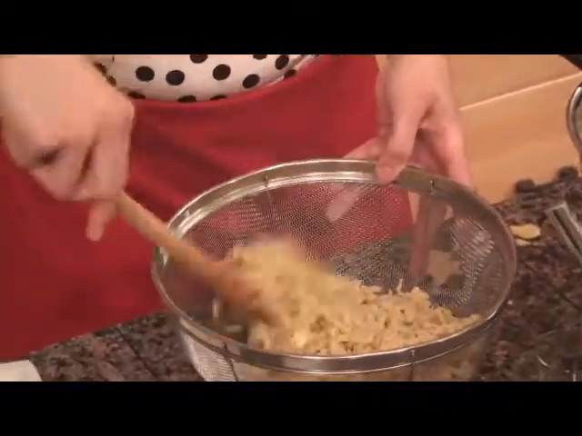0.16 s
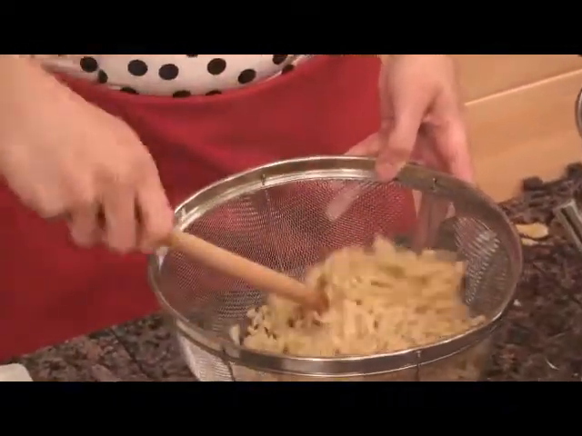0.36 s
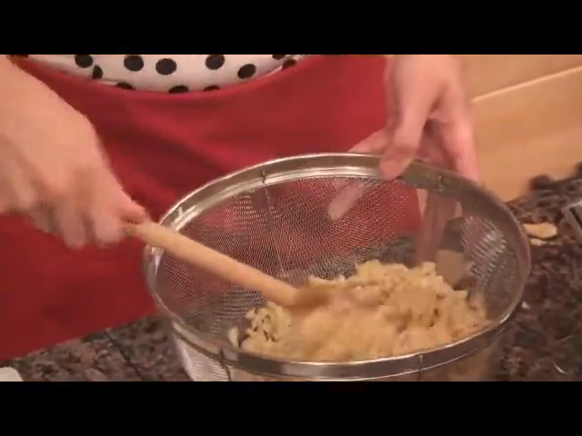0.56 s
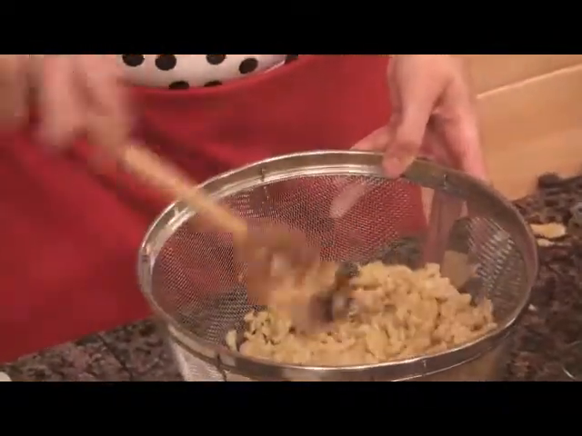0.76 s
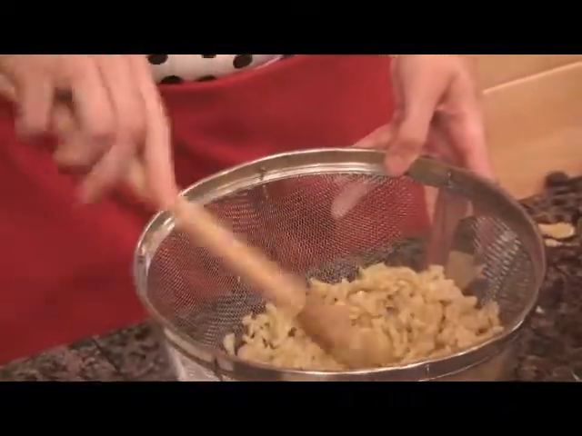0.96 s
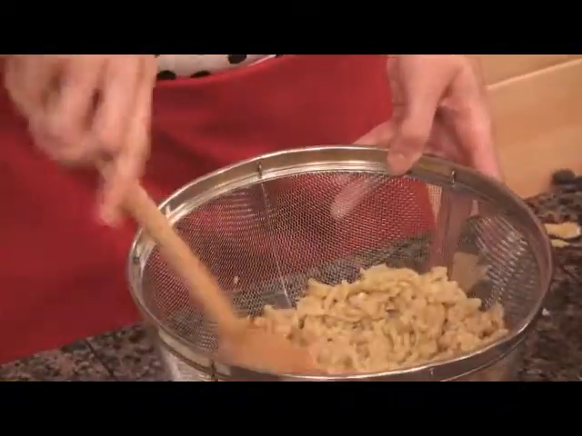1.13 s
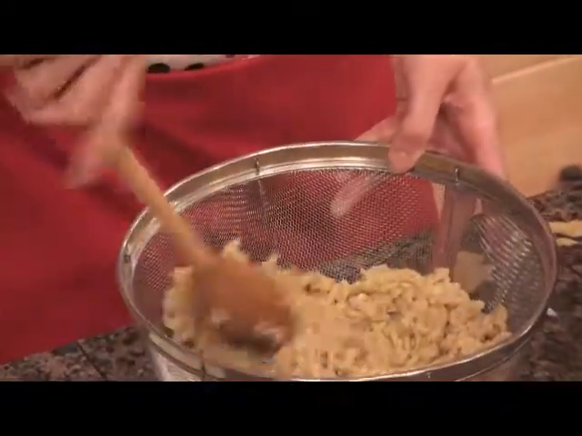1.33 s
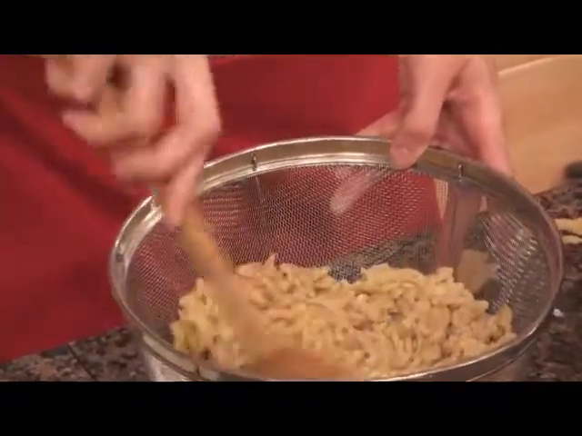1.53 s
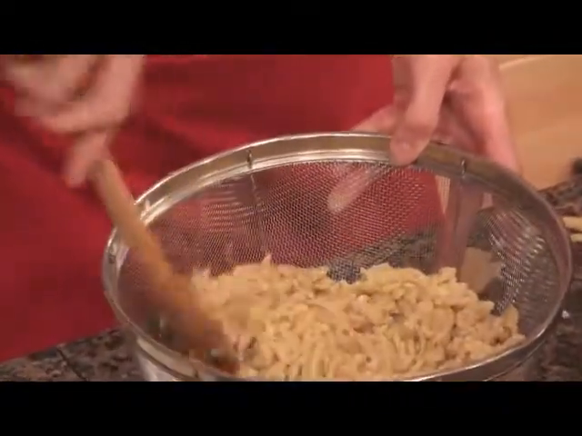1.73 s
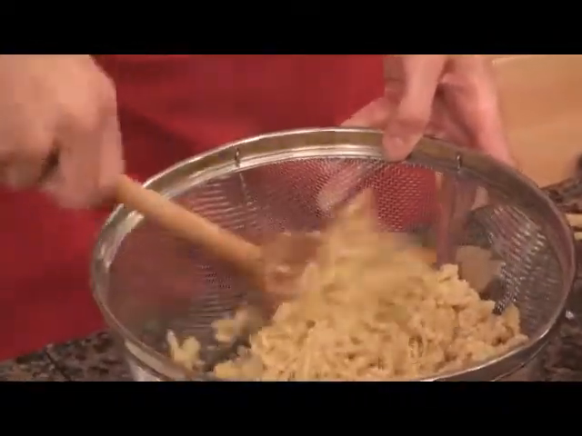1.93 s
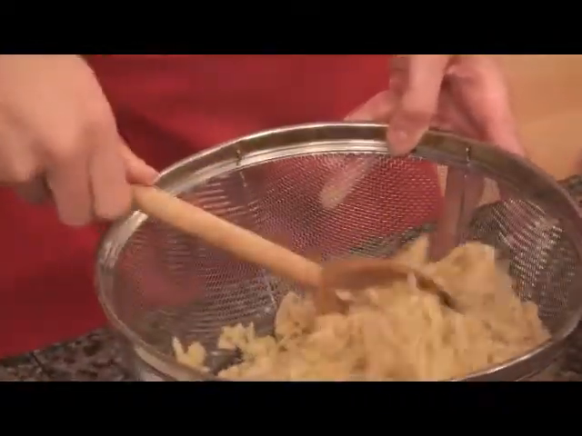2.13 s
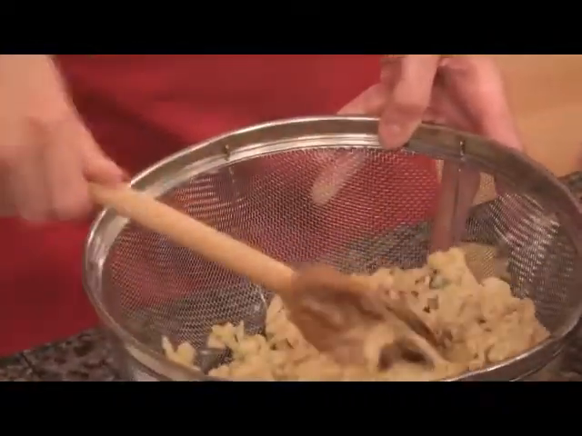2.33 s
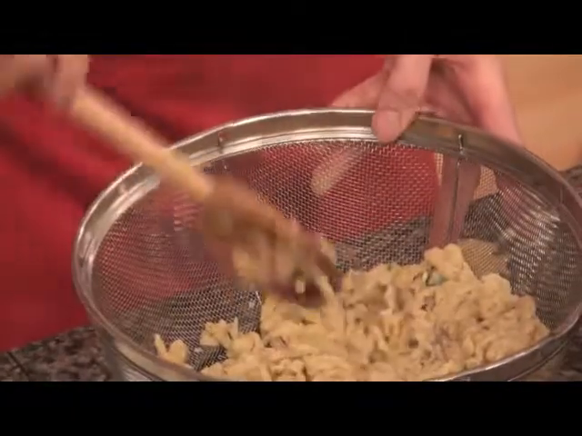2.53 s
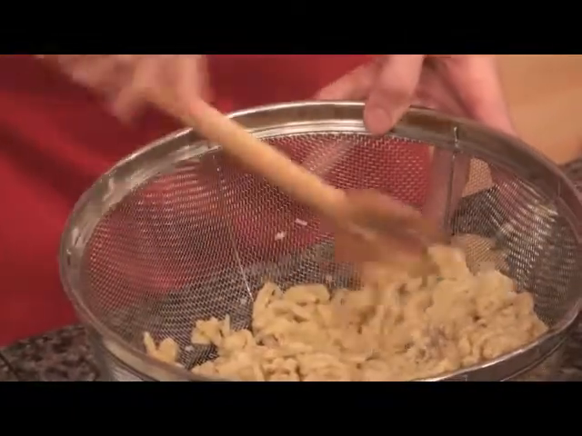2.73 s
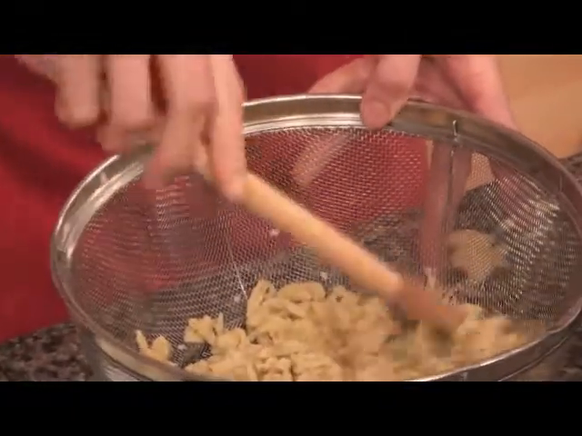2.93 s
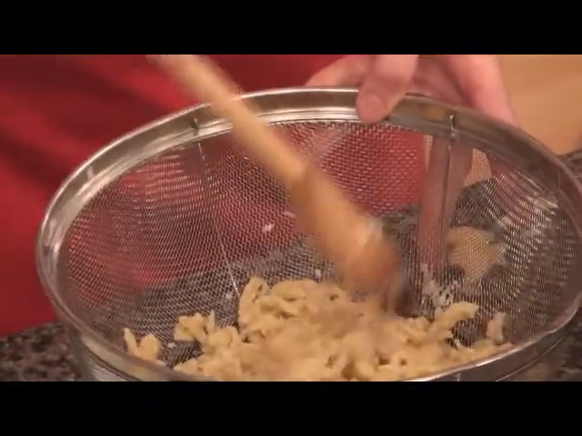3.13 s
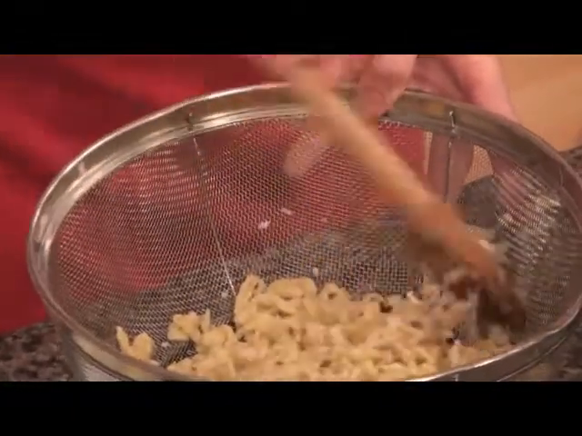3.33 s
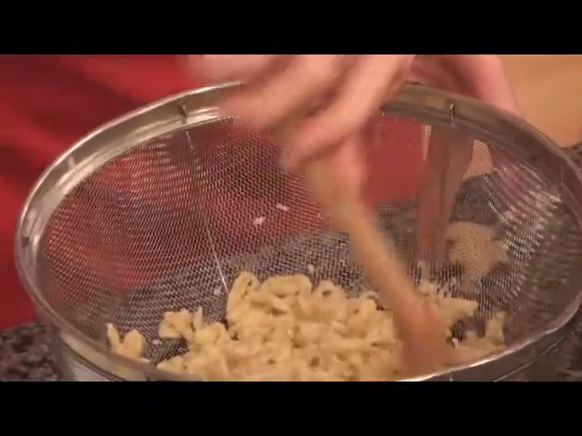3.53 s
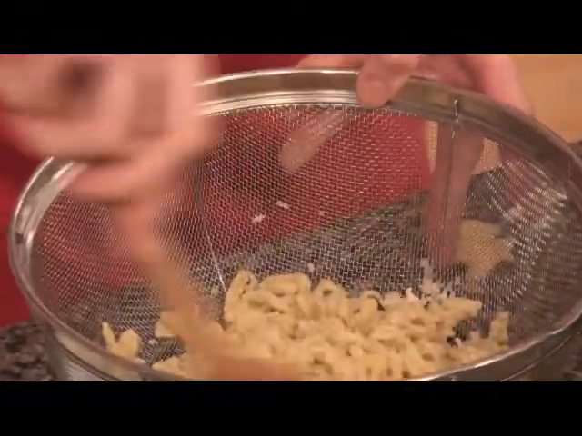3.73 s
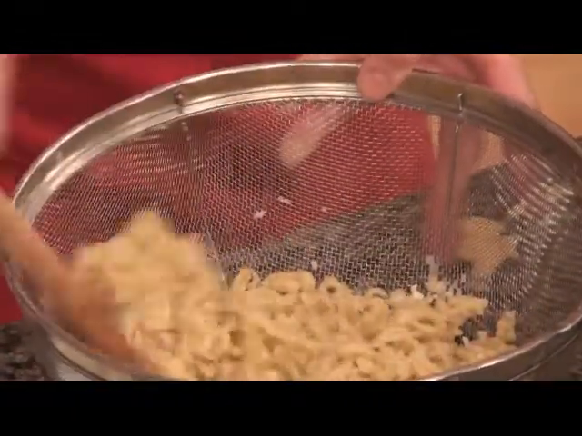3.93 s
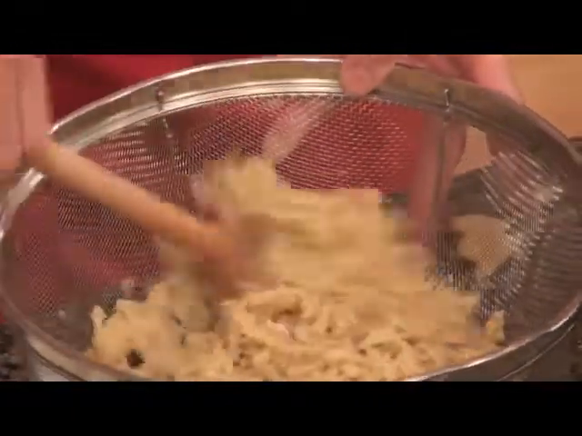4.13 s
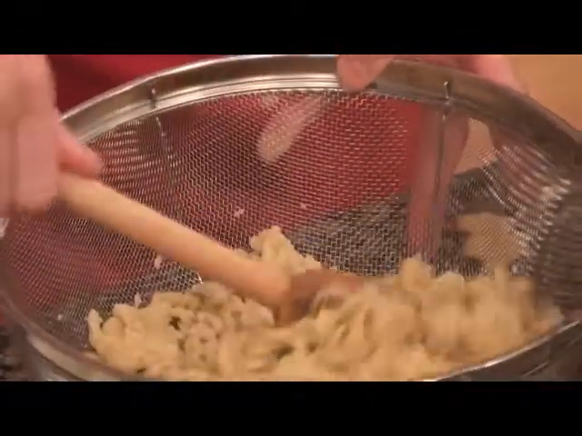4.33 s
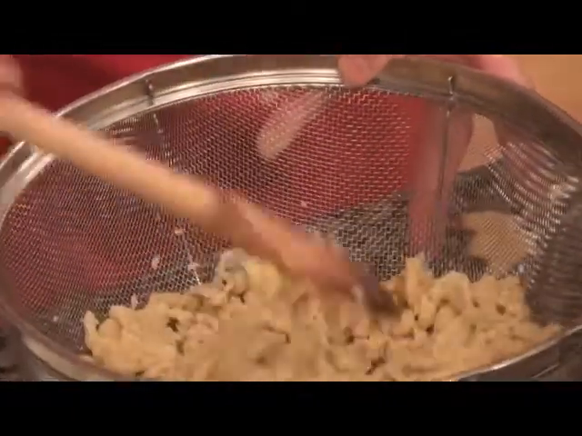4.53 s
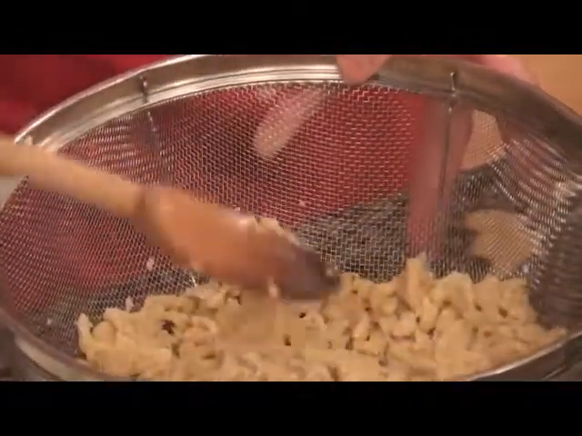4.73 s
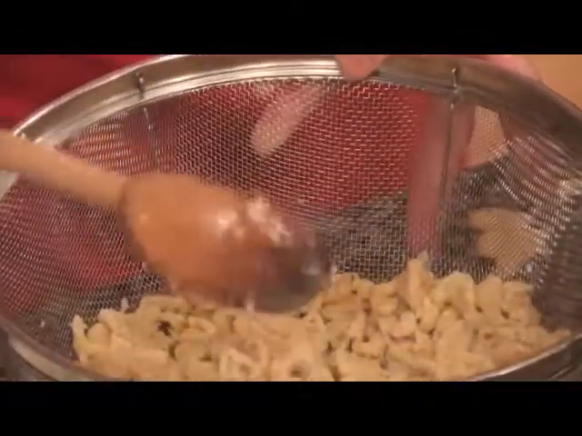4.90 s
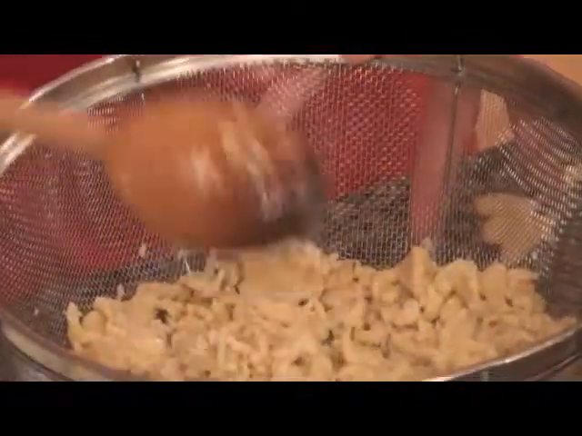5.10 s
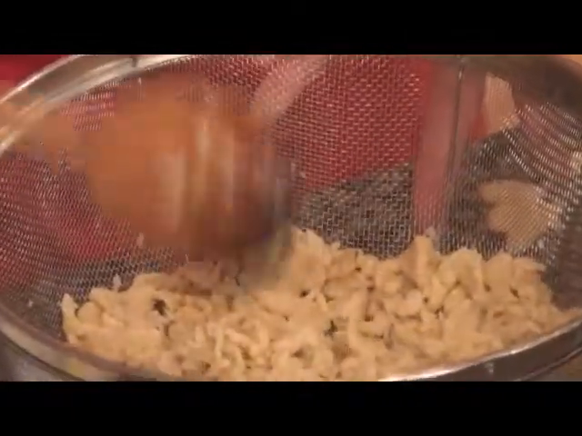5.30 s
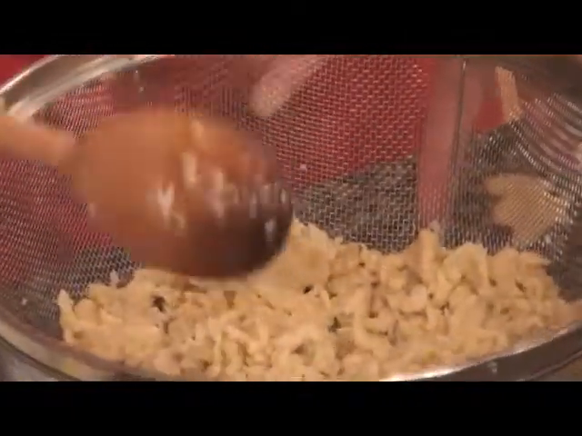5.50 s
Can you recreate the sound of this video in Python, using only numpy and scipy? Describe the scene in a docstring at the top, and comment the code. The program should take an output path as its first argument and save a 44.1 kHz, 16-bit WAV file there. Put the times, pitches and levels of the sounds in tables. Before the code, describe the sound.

Wet scrapes and smacks of noodles tossed in a steel strainer, ending with six quick knocks of a wooden spoon on its rim.

```python
"""Wet rasps and smacks: a wooden spoon tosses moist noodles in a steel mesh strainer, then raps six times
on the rim to shake itself clean. Stick-slip friction on the wires makes the rasp, bursting air pockets
pop in the food, and each rap excites the damped modes of the rim and sets the mesh buzzing.
The kitchen reverberates and an appliance hums. One close microphone also picks up faint low thumps
that come in pairs, like a heartbeat under a clip-on microphone."""
import sys
import numpy as np
from scipy import signal
from scipy.fft import rfft, irfft, next_fast_len
from scipy.io import wavfile
from scipy.ndimage import map_coordinates

SR = 44100
rng = np.random.default_rng(int(sys.argv[2]) if len(sys.argv) > 2 else 0)


def wav_out(sig):
    """Save sig, one row per channel (or a flat mono array), as 16-bit PCM at SR to the path in sys.argv[1]."""
    wavfile.write(sys.argv[1], SR, np.round(np.clip(np.atleast_2d(sig).T, -1, 1) * 32767).astype(np.int16))


N = 249492


def amp(db):
    """Decibels to amplitude ratio."""
    return 10 ** (np.asarray(db) / 20)


def unit(x):
    """Normalisation to rms 1."""
    return x / np.sqrt(np.mean(x ** 2) + 1e-20)


def along(points, hz):
    """Interpolation of (frequency_hz, value) points on a logarithmic frequency axis."""
    frequencies, values = np.transpose(points)
    return np.interp(np.log(hz + 1), np.log(frequencies + 1), values)


def wobble(rate):
    """Smooth random modulation: a spline through `rate` knots a second."""
    knots = rng.standard_normal(int(N * rate / SR) + 4)
    return map_coordinates(knots, [np.arange(N) * rate / SR])


def filtered(x, response):
    """Linear filtering: the spectrum of x times a frequency response."""
    size = next_fast_len(len(x) + 4096)
    return irfft(rfft(x, size) * response(np.fft.rfftfreq(size, 1 / SR)), size)[:len(x)]


def coloured(x, spectrum):
    """Spectral shaping by (frequency_hz, level_db) points, at rms 1."""
    return unit(filtered(x, lambda hz: amp(along(spectrum, hz))))


def resonant(x, hz, width):
    """Resonance: one steep-sided band of x, at rms 1."""
    return unit(filtered(x, lambda f: 1 / (1 + (2 * (f - hz) / width) ** 2)))


def add(track, start_s, sound):
    """Superposition of a sound on a track."""
    start = round(start_s * SR)
    part = sound[max(-start, 0):max(N - start, 0)]
    track[max(start, 0):][:len(part)] += part


def grains(n, rate, spread_db, bed):
    """Shot noise: `rate` uneven impacts a second on a Gaussian bed of countless smaller ones."""
    sizes = amp(spread_db * np.minimum(rng.standard_normal(n), 2)) * rng.choice([-1, 1], n)
    impacts = unit(sizes * (rng.random(n) < rate / SR))
    return unit(impacts + bed * rng.standard_normal(n))


# Preamplifier noise spectrum: frequency_hz, density_db
HISS_SPECTRUM = [(20, 35), (100, 19), (500, -7), (1500, -15), (4000, -9), (9000, -2), (16000, 2.5)]

def preamp_hiss():
    """Electronic self-noise of one channel."""
    return amp(-64) * coloured(rng.standard_normal(N), HISS_SPECTRUM)


# Mains hum partials: pitch_hz, rms_db
HUM_PARTIALS = [(60, -59.5), (180, -68), (240, -44), (300.5, -52.5), (660, -67.5)]
# Resonances of the air noise in the appliance: centre_hz, width_hz, rms_db
FAN_BANDS = [(396, 11, -71.5), (734, 160, -60.5), (1990, 300, -58)]
# Room noise spectrum: frequency_hz, density_db
ROOM_SPECTRUM = [(20, -3), (100, 1.5), (200, 3), (400, -0.5), (700, -4), (1000, -7), (1300, -11.5),
                 (1700, -10), (2400, -17.5), (3000, -16.5), (5000, -22.5), (9000, -24), (16000, -30)]

def appliance():
    """Mains hum, slightly modulated in amplitude and phase, over fan resonances and steady room noise."""
    t = np.arange(N) / SR
    swell_db, sway_rad = 0.8 * wobble(5), 0.24 * wobble(3.9)
    hum = sum(amp(db) * np.sqrt(2) * np.sin(2 * np.pi * (hz * t + rng.random()) + sway_rad)
              for hz, db in HUM_PARTIALS)
    fan = sum(amp(db) * resonant(rng.standard_normal(N), hz, width) for hz, width, db in FAN_BANDS)
    room = amp(-46.5) * coloured(rng.standard_normal(N), ROOM_SPECTRUM)
    return amp(swell_db) * hum + fan + room


def thumps(first_s=0.0128, period_s=.633, gap_s=.287, level_db=-41):
    """Paired low pulses: each is a falling tone under a Gaussian envelope."""
    out, t = np.zeros(N), np.arange(-SR // 12, SR // 8) / SR
    swell = np.exp(-(t / 0.039) ** 2)
    glide = 33 + 19 * np.exp(-t / 0.025).clip(0, 5)
    for beat in np.arange(first_s, N / SR, period_s):
        for centre_s in (beat, beat + gap_s):
            hz = glide * np.exp(0.15 * rng.standard_normal())
            size = amp(level_db + rng.standard_normal())
            tone = np.sin(2 * np.pi * (np.cumsum(hz) / SR + rng.random()))
            add(out, centre_s + t[0], size * swell * tone)
    return out


# Reverberation time of the kitchen: frequency_hz, t60_s
KITCHEN_DECAY = [(200, 0.49), (1300, 0.82), (4000, 0.68), (9000, 0.45), (16000, 0.31)]

def kitchen(x, size=256):
    """Diffuse reverberation: each band stores energy and loses it exponentially, with random phases."""
    hz, _, bands = signal.stft(x, SR, nperseg=size)
    hop_s = size / 2 / SR
    retained = amp(-120 * hop_s / along(KITCHEN_DECAY, hz))  # share of energy left after one hop
    energy = np.array([signal.lfilter([0, 1 - share], [1, -share], abs(band) ** 2)
                       for share, band in zip(retained, bands)])
    noise = signal.stft(rng.standard_normal(N), SR, nperseg=size)[2]
    diffuse = noise * np.sqrt(energy / np.mean(abs(noise) ** 2))
    return signal.istft(diffuse, SR, nperseg=size)[1][:N]


def pops(count=260):
    """Cavity resonance: tiny air pockets burst between the noodles, each ringing for a few cycles."""
    out, t = np.zeros(N), np.arange(SR // 50) / SR
    starts = rng.random(count) * N / SR
    for start, (pitch, size) in zip(starts, rng.standard_normal((count, 2)).clip(-2, 2)):
        hz = 4800 * np.exp(.42 * pitch)
        add(out, start, amp(4.5 * size) * np.sin(2 * np.pi * hz * t) * np.exp(-hz * t / 4))
    return unit(out)


def push_force(start, length, swell_db, release_s=0.042, attack_s=0.0013):
    """Force envelope of a push: a quick attack, a ramp of swell_db ending at 1, an exponential release."""
    t = np.maximum(np.arange(N) / SR - start, 0)
    swell = amp(swell_db * (np.minimum(t / length, 1) - 1))
    return (1 - np.exp(-t / attack_s)) * swell * np.exp(-np.maximum(t - length, 0) / release_s)


# Spectra of wood on wire, wet crackle and tumbling food: frequency_hz, density_db
RASP_SPECTRUM = [(350, -42), (600, -14), (672, -8), (745, -13.5), (869, -10), (943, -2.5), (1350, 1.5),
                 (1770, -2.5), (2890, -1.5), (3630, -13.5), (3940, -1.5), (4640, -16.5), (5880, -11),
                 (7000, -19.5), (9100, -48), (15400, -120)]
CRACKLE_SPECTRUM = [(2500, -3), (4300, 1), (5800, 1), (7500, -1.5), (10500, -5.5), (13000, -10.5),
                    (16000, -19)]
TUMBLE_SPECTRUM = [(120, -13), (250, 5.5), (360, 5), (500, 0), (680, -3.5), (900, -5.5), (1500, -23)]
# Pushes of the spoon, each on its own patch of mesh; wet, food and patch levels are offsets to level_db:
# start_s, length_s, level_db, swell_db, wet_db, food_db, patch_db, patch_hz
SPOON_PUSHES = [(0.0, 0.066, -40, -2.5, -3.5, -4.5, -13, 2800),
                (0.081, 0.027, -41.5, -4.5, -1, -8, -1.5, 5600),
                (0.138, 0.074, -34.5, 2, -7, -4.5, -10, 1500),
                (0.274, 0.035, -40.5, -3, -0.5, -2.5, -4.5, 2760),
                (0.36, 0.076, -37.5, 9, -10, -14, -3.5, 2130), (1.13, 0.11, -40, 5, -9, -3, -3, 1240),
                (1.24, 0.078, -33, 9.5, -8.5, -4, -8.5, 2860), (1.7, 0.09, -26.5, 25.5, 1, -7, -13, 3830),
                (1.785, 0.096, -42, -7.5, -6, -2.5, 1, 675), (1.911, 0.16, -37, 3, -6.5, -5.5, -10, 1480),
                (2.05, .03, -42.5, -3.5, -5, 6, -1.5, 358), (2.13, 0.076, -41.5, 2.5, 2, -5, -27, 1570),
                (2.799, 0.032, -37.5, 8, -2, -2, -21, 2760), (2.886, 0.072, -39.5, 2.5, -5.5, 2, -6, 1720),
                (3.49, 0.074, -42.5, 5, 2, -2, -1.5, 920), (3.57, .13, -42.5, 3, -11, -4, -8, 2230),
                (3.715, 0.16, -43.5, -2, -2, -1.5, -11, 3150), (3.89, 0.12, -39, 2, -4.5, -4.5, -13, 1540),
                (4.02, 0.087, -48, -3, 1, 2, -10, 4400), (4.172, 0.07, -41, 0, 0, 0, -8, 1490),
                (4.308, 0.04, -44, -5.5, -3, -12, -16, 2060)]

def stirring(settle_s=0.16, settle_db=-10.5):
    """Stick-slip friction: the spoon jerks over the wires while wet food crackles, pops and tumbles."""
    levels = np.zeros((3, N))
    for start, length, db, swell_db, wet_db, food_db, _, _ in SPOON_PUSHES:
        force = push_force(start, length, swell_db)
        settling = amp(settle_db) * push_force(start, length, swell_db, release_s=settle_s)
        moving = np.maximum(force, settling)  # tossed food moves on after the push
        push = [amp(db) * force, amp(db + wet_db) * moving, amp(db + food_db) * moving]
        levels = np.hypot(levels, push)  # incoherent sounds add in power
    jerk_db = 1.3 * wobble(55)
    slips = grains(N, rate=1000, spread_db=5, bed=.45)
    rasp = amp(jerk_db - 2.5) * coloured(slips, RASP_SPECTRUM)
    spits = grains(N, rate=500, spread_db=1.5, bed=0.93)
    crackle = amp(jerk_db - 4.5) * coloured(spits, CRACKLE_SPECTRUM)
    tumble = amp(-4) * coloured(grains(N, rate=300, spread_db=-1, bed=0.78), TUMBLE_SPECTRUM)
    wet = crackle + amp(-8) * pops()
    return np.sum(levels * [rasp, wet, tumble], axis=0)


def mesh_rubs():
    """Forced vibration: the slips of each push drive the resonance of its patch of mesh."""
    out, n = np.zeros(N), SR // 2
    for start, length, db, swell_db, _, _, patch_db, hz in SPOON_PUSHES:
        slips = grains(n, rate=1700, spread_db=4, bed=0.98)
        width_hz = 160 * (hz / 1000) ** 1.24
        force = push_force(0, length, swell_db)[:n]
        add(out, start, amp(db + patch_db) * force * resonant(slips, hz, width_hz))
    return out


# Sticky noodles let go of the mesh: start_s, level_db
NOODLE_SMACKS = [(0.529, -39), (1.5206, -48), (1.968, -22.5), (2.021, -21.5), (2.052, -22.5),
                 (2.133, -17.5), (3.0678, -28), (3.726, -25), (3.836, -29), (4.0322, -25), (4.1726, -24.5),
                 (4.3114, -33)]

def smacks(strays_per_push=3, within_s=.3, fade_db_per_s=48, t60_s=0.018):
    """Adhesion gives way in bright wet clicks; strays follow every push, fainter the later they come."""
    out, t = np.zeros(N), np.arange(SR // 30) / SR
    strays = [(start + length + delay, db + 5 - fade_db_per_s * delay)
              for start, length, db, *_ in SPOON_PUSHES
              for delay in within_s * rng.random(strays_per_push)]
    for start, db in NOODLE_SMACKS + strays:
        click = coloured(rng.standard_normal(len(t)), CRACKLE_SPECTRUM)
        add(out, start, amp(db - 6 - 60 * t / t60_s) * click)
    return out


# The spoon catches on the wires: start_s, level_db, treble_offset_db, length_s
WIRE_CATCHES = [(0.084, -27, -7, .02), (0.274, -17, -20, .02), (0.295, -20, -11, .03),
                (0.433, -24, -8, .03), (1.107, -29.5, -12, .04), (1.126, -32, -7, .021),
                (1.346, -19, -25, 0.022), (1.762, -15, -8, 0.039), (1.783, -13.5, -4.5, 0.043),
                (2.137, -28, -2, .02), (2.762, -28.5, -12.5, 0.04), (3.426, -27.5, -3.5, 0.019),
                (3.502, -22, -1.5, 0.025), (3.527, -15.5, -8.5, 0.048), (3.8931, -16, -20, 0.029),
                (3.903, -15, -16, .024), (3.972, -12.5, -12, 0.0098), (4.17, -17.5, -22, 0.026),
                (4.191, -20, -9, 0.029)]

def catches():
    """Friction transients: a quick run of slips over neighbouring wires, with a wet edge."""
    force, wet_edge, t = np.zeros(N), np.zeros(N), np.arange(SR // 5) / SR
    for start, db, treble_db, length in WIRE_CATCHES:
        envelope = (1 - np.exp(-t / 0.00075)) * amp(-30 * t / length)
        add(force, start, amp(db - 14.5) * envelope)
        add(wet_edge, start, amp(db + treble_db - 5) * envelope)
    slips, spits = (grains(N, rate=2500, spread_db=1.5, bed=0.48) for _ in range(2))
    return force * coloured(slips, RASP_SPECTRUM) + wet_edge * coloured(spits, CRACKLE_SPECTRUM)


# Faint lasting modes of the steel bowl: pitch_hz, level_db, t60_s
BOWL_MODES = [(1200, -43, .4), (2660, -24, 0.29), (2785, -40, .4), (2780, -31, 0.49), (4050, -45, 0.34),
              (4900, -46, 0.36), (5112, -48, 0.52), (5178, -48, .4)]

def bowl_ring(t):
    """Free vibration: damped modes struck from rest, at slightly random strengths and tunings."""
    scatter = rng.standard_normal((len(BOWL_MODES), 2))
    return sum(amp(db + louder - 60 * t / t60) * np.sin(2 * np.pi * (hz + detune / t60) * t)
               for (hz, db, t60), (louder, detune) in zip(BOWL_MODES, scatter))


# Spectrum of the buzzing mesh: frequency_hz, density_db
BUZZ_SPECTRUM = [(60, -20), (150, 0), (400, 0), (750, -13.5), (1200, 2.5), (2200, 0.5), (2950, -6.5),
                 (3500, -3), (5200, 1.5), (7000, -2.5), (9500, -5.5), (13000, -12.5), (16000, -17)]

def mesh_buzz(t, t60_s=0.031, attack_s=0.00036):
    """Contact noise: loosened wires rattle briefly across the whole mesh."""
    rattle = coloured(grains(len(t), rate=2600, spread_db=4, bed=0.7), BUZZ_SPECTRUM)
    return rattle * amp(-60 * t / t60_s) * (1 - np.exp(-t / attack_s))


# Broad resonances of the hand-damped rim: centre_hz, width_hz, level_db
RIM_RESONANCES = [(203, 104, -10.5), (544, 75, -10), (1295, 318, -3), (1510, 99, -13), (2817, 250, 1.5),
                  (4170, 310, -5), (4890, 340, -4), (6700, 610, -22)]

def rim_clank(t, middle_db):
    """Heavy damping: each resonance swells for a few cycles and dies, the sooner the wider it is."""
    out = np.zeros(len(t))
    contact = [(1700, 0), (2800, middle_db + 14), (4200, 0)]  # the point struck weights the middle band
    for hz, width, db in RIM_RESONANCES:
        strength = amp(db + along(contact, hz) + 0.9 * rng.standard_normal())
        age = 2 * np.pi * width * t  # in time constants
        out += strength * width * age ** 2 * np.exp(-age) * np.sin(2 * np.pi * hz * t)
    return out / np.abs(out).max()


# Raps of the spoon on the rim: start_s, level_db, middle_db (weight of the 2.8 kHz band)
RIM_RAPS = [(4.812, -10, -15.5), (4.967, -1.5, -19), (5.117, -5, -18), (5.283, -3, -13.5),
            (5.446, -1.5, -12.5), (5.607, 0, -17)]

def raps():
    """Impact excitation: wood on the rim gives a dry clank, a trace of ringing steel and a mesh buzz."""
    rim, mesh, t = np.zeros(N), np.zeros(N), np.arange(SR // 3) / SR
    for start, db, middle_db in RIM_RAPS:
        steel = rim_clank(t, middle_db) + amp(-12) * bowl_ring(t)
        add(rim, start + .0005, amp(db - 2) * steel)
        add(mesh, start + .0005, amp(1.39 * db - 13.5) * mesh_buzz(t))  # hard blows loosen more wires
    return rim, mesh


def scene():
    """Direct sound, a ceiling reflection and the diffuse field sum at one microphone, on two channels."""
    rim, mesh = raps()
    tossing = stirring() + mesh_rubs() + catches() + smacks()
    direct = tossing + rim + mesh
    ceiling = amp(-13.5) * np.pad(direct, (round(.0153 * SR), 0))[:N]
    # Directivity: the mesh radiates all round the room, the rim mostly straight ahead.
    reverb = kitchen(amp(-4.5) * tossing + amp(-5) * rim + amp(3) * mesh)
    mono = direct + ceiling + reverb + thumps() + appliance()
    return np.array([mono + preamp_hiss() for channel in range(2)])


def record(dry, cutoff_hz=15900):
    """Band limiting: an ideal low-pass filter on each channel."""
    return np.array([filtered(channel, lambda hz: hz < cutoff_hz) for channel in dry])


dry = scene()
out = record(dry)
wav_out(out)
```